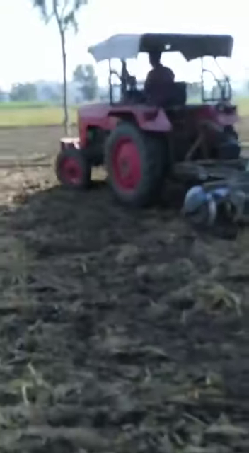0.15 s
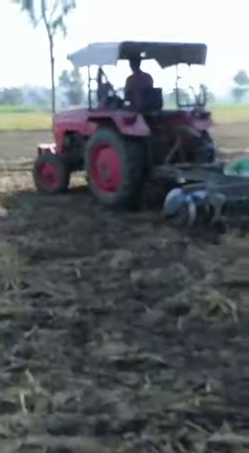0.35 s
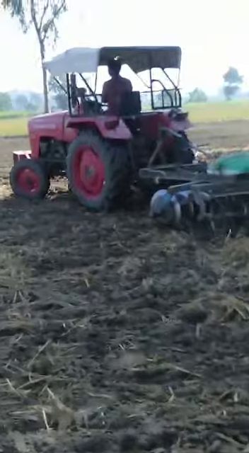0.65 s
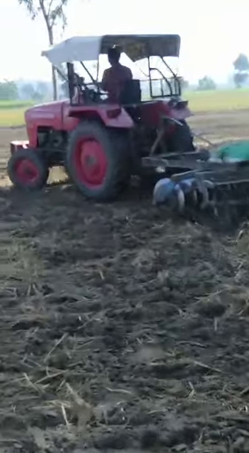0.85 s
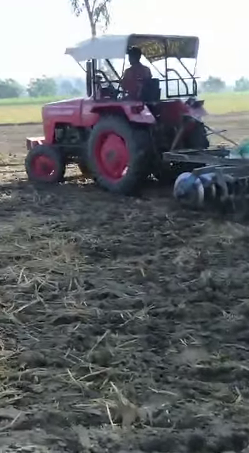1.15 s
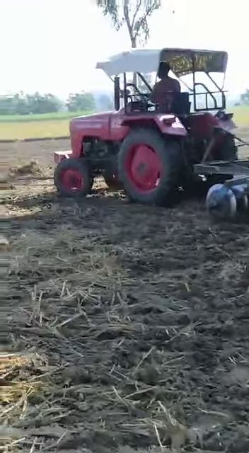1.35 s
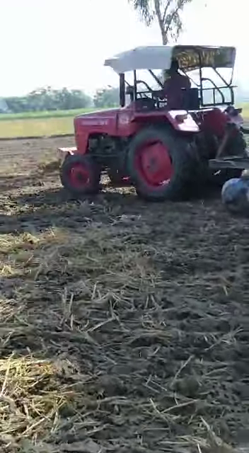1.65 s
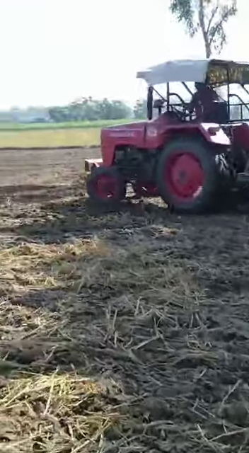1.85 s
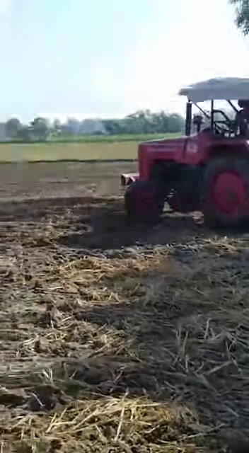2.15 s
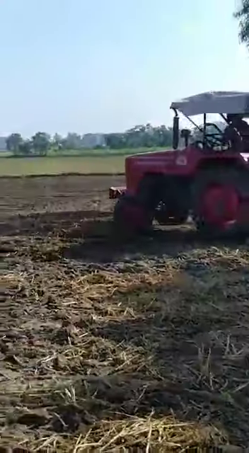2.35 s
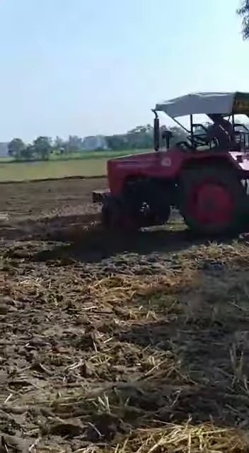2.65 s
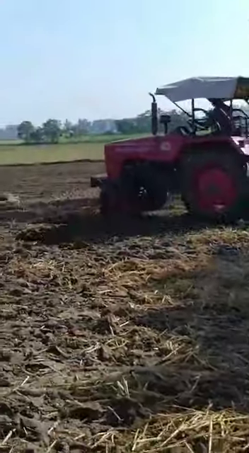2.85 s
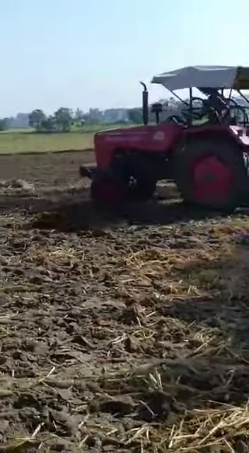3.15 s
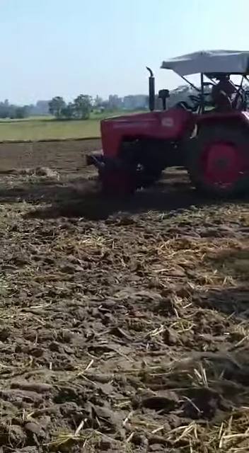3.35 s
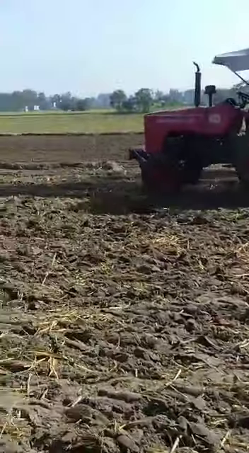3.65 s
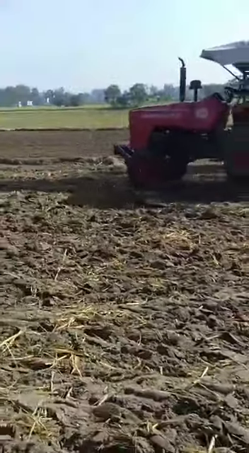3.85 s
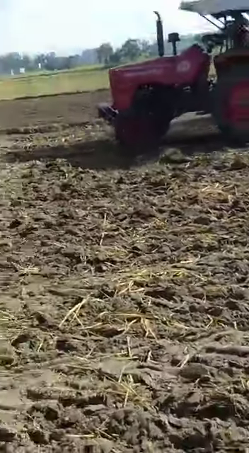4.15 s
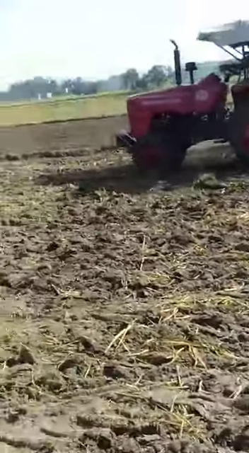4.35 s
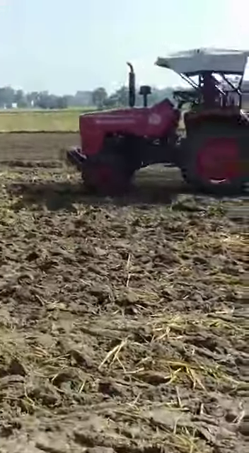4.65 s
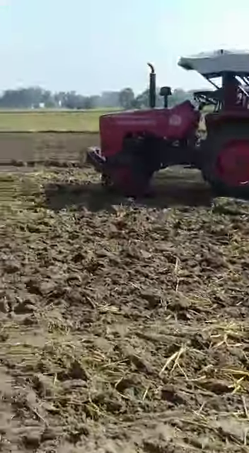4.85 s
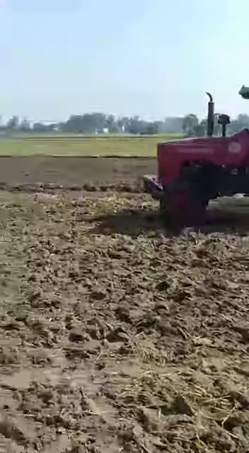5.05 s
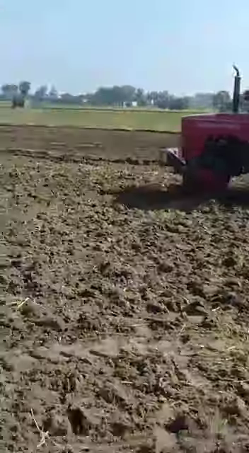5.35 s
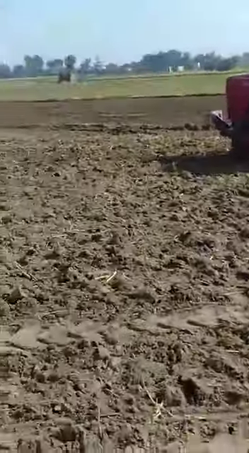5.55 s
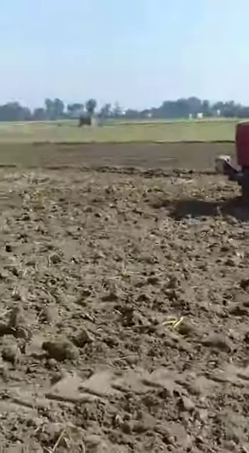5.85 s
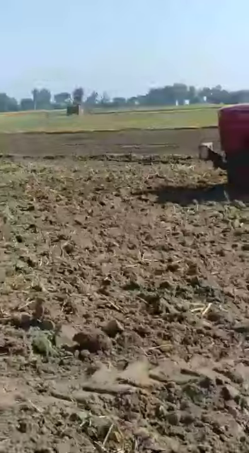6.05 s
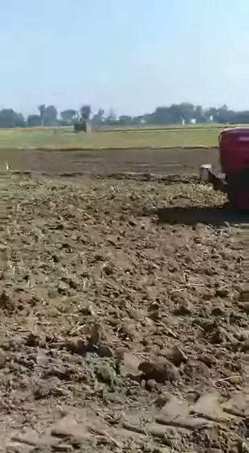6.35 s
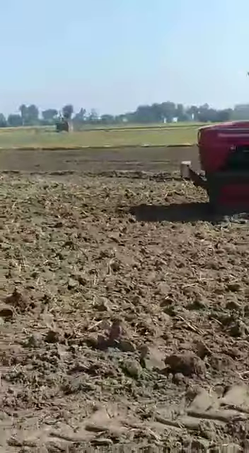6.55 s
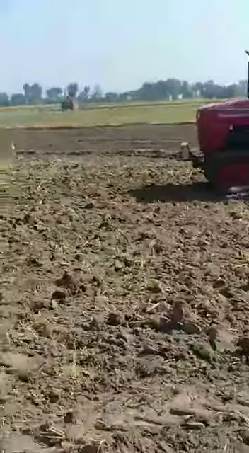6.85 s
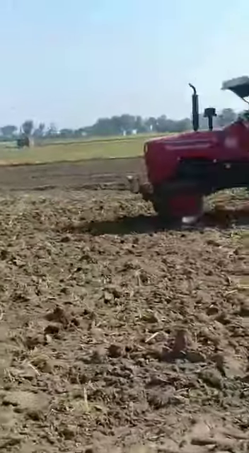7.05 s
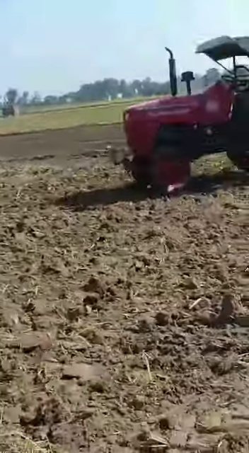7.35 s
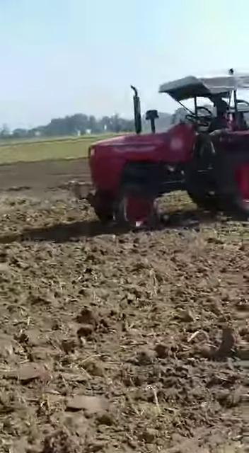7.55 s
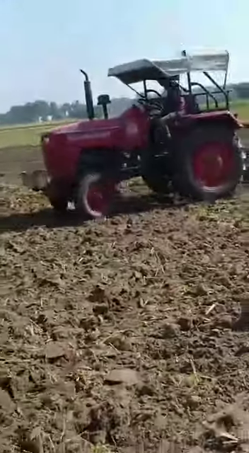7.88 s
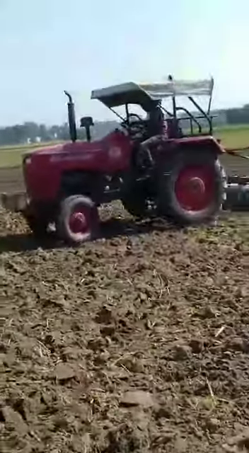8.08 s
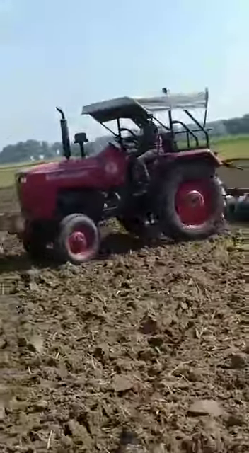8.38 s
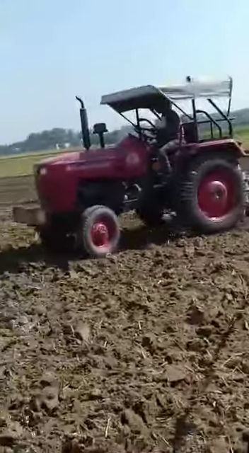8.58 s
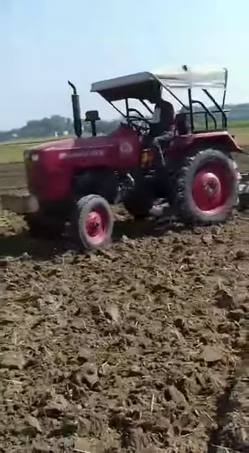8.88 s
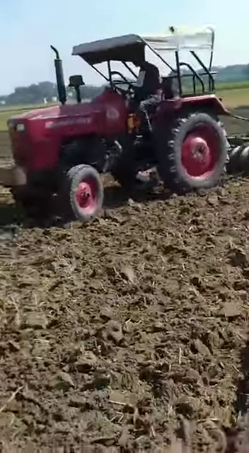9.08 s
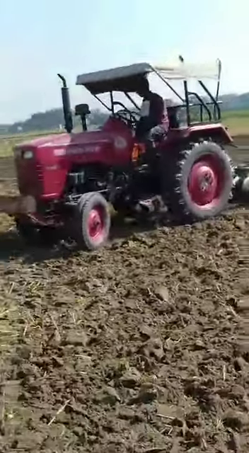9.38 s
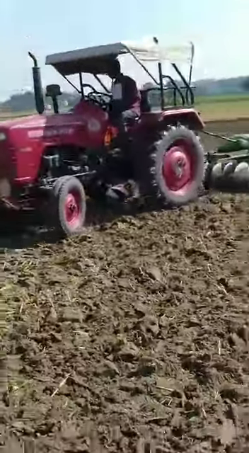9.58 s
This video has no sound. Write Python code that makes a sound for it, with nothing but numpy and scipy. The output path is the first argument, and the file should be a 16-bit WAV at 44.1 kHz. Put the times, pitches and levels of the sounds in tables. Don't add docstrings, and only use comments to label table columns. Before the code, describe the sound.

A four-cylinder diesel tractor clatters and throbs under load, dragging a clanking disc harrow over soft soil, slowly turning and growing a little louder.

```python
import sys
import numpy as np
from scipy import signal
from scipy.fft import rfft, irfft, next_fast_len
from scipy.io import wavfile
from scipy.ndimage import uniform_filter1d, map_coordinates

SR = 44100
rng = np.random.default_rng(int(sys.argv[2]) if len(sys.argv) > 2 else 0)


def field_ratio(decibels):
    return 10 ** (np.asarray(decibels, dtype=float) / 20)


def unload_wav(signal):
    wavfile.write(
        sys.argv[1],
        SR,
        np.round(np.clip(np.atleast_2d(signal).T, -1, 1) * 32767).astype(np.int16),
    )


N = 428652
TIME = np.arange(N) / SR
HZ = np.maximum(np.fft.rfftfreq(next_fast_len(N), 1 / SR), 1)
CUTOFF_HZ = 15720


def in_time(rows):
    s, *columns = np.transpose(rows)
    return [np.interp(TIME, s, column) for column in columns]


def at_hz(points, hz, axis=1):
    points = np.array(points)
    return np.interp(np.log(hz), np.log(points[:, 0]), points[:, axis])


def rms_one(x):
    return x / np.sqrt(np.mean(x ** 2) + 1e-20)


def shaped(x, gain):
    size = next_fast_len(N)
    return irfft(rfft(x, size) * gain, size)[:N]


def drift(rate_hz):
    r = np.exp(-80 * np.pi * rate_hz / SR)
    slow = signal.lfilter([1], [1, -2 * r, r * r], rng.standard_normal(N // 40 + 2002))
    slow = slow[2000:]
    return np.interp(np.arange(N) / 40, np.arange(len(slow)), rms_one(slow))


def facing(levels_db):
    # (time [s], angle between bonnet and listener [deg])
    heading = [(0, 115), (1.2, 116), (2.1, 104), (2.7, 99), (3.6, 86.2), (4.8, 89), (5.3, 69.4), (7.3, 60),
               (7.8, 47), (8.9, 43.4), (9.4, 31), (9.72, 33)]
    seen_from_deg = [140, 95, 68, 45, 30]
    return np.interp(-in_time(heading)[0], -np.array(seen_from_deg), levels_db)


def throb(cycle, rise=.16, spread=.12):
    cylinder_strength = [0.58, -0.66, -1.33, -1.1]
    firing = 4 * cycle
    number, part = firing.astype(int), firing % 1
    shape = np.minimum(part / rise, (1 - part) / (1 - rise)) - .5
    uneven = spread * rng.standard_normal(800)[number]
    cylinder_db = np.array(cylinder_strength)[number % 4]
    return uniform_filter1d(shape + uneven, size=40), uniform_filter1d(cylinder_db, size=120)


def habit(cycle, likeness=.88, size=2500):
    fresh = rng.standard_normal((220, size))
    rounds = signal.lfilter([1], [1, -likeness], fresh, axis=0)[30:].ravel()
    return rms_one(rounds[(cycle * size).astype(int)])


def iron(x, t60=.09, ring_db=-13):
    t = np.arange(4000) / SR
    turn = 1.4 * drift(.8)
    rings = rng.standard_normal((2, len(t))) * field_ratio(-60 * t / t60)
    first, second = (signal.oaconvolve(x, ring / np.linalg.norm(ring))[:N] for ring in rings)
    return x + field_ratio(ring_db) * (np.cos(turn) * first + np.sin(turn) * second)


def block(cycle, near_db, patchy_db=0.5):
    # (frequency [Hz], level [dB per Hz])
    knock_colour = [(180, -8), (250, -17), (340, -14.5), (430, -7.5), (520, 2.5), (750, -0.5), (1200, -3),
                    (1700, -4.5), (2300, 1.5), (2900, -3.5), (3500, -15), (6300, -17.5), (7600, -26.5),
                    (9500, -47.5)]
    # (frequency [Hz], share [0-1])
    repeat_share = [(250, .4), (700, .48), (1200, .48), (2200, .2), (3500, .1), (8000, .04)]
    # (frequency [Hz], swell per firing [dB])
    throb_depth = [(250, 4.5), (700, 3.5), (1200, 2), (2200, 3.5), (3500, 4.5), (8000, 4)]
    # (frequency [Hz], level seen from each of the five angles [dB])
    parts = [(300, -13, -24, -21.5, -14, -17.5), (500, -11, -11.5, -9, -6.5, -8),
             (740, -14.5, -4.5, -4.5, -4.5, -5), (1060, -18, -14, -6.5, -10, -14),
             (1560, -6.5, -6, -10, -12, -2.5), (2020, 0.5, -5.5, -4.5, -1, -4),
             (2500, -7.5, -7, -5, -5, -11), (3100, -16, -7, -8.5, -4.5, -7.5),
             (4430, -20, -16.5, -20.5, -13, -15.5), (6560, -23.5, -19, -13.5, -17, -21)]
    share, size = at_hz(repeat_share, HZ), next_fast_len(N)
    clatter = rfft(habit(cycle), size) * np.sqrt(share)
    combustion = rfft(rng.standard_normal(N), size) * np.sqrt(1 - share)
    source = (clatter + combustion) * field_ratio(at_hz(knock_colour, HZ))
    shape, cylinder_db = throb(cycle)
    together, out = drift(5.8), 0
    for octave in np.arange(7.5, 13.6, .4):
        hz = 2 ** octave
        mask = np.cos(np.pi / 2 * np.clip((np.log2(HZ) - octave) / .4, -1, 1)) ** 2
        seen_db = near_db + facing([at_hz(parts, hz, axis=k) for k in range(1, 6)])
        level_db = seen_db - seen_db.mean() + at_hz(throb_depth, hz) * shape + cylinder_db
        level_db += patchy_db * (0.13 * together + drift(2.3))
        out = out + field_ratio(level_db) * irfft(source * mask, size)[:N]
    return field_ratio(-23.5) * rms_one(iron(out))


def rattle(cycle, loud_db, per_s=600, ring_cycles=38):
    shaken = (4 * cycle % 1 < .45) & (rng.random(N) < per_s / SR)
    strength = field_ratio(4 * np.minimum(rng.exponential(1, N), 4))
    ticks = shaken * strength * rng.choice([-1, 1], N) + 1e-18
    dealt, out = rng.integers(0, 16, N), 0
    for k, hz in enumerate(np.geomspace(1000, 3100, 16)):
        r, w = field_ratio(-60 * hz / ring_cycles / SR), 2 * np.pi * hz / SR
        out = out + signal.lfilter([0, np.sin(w)], [1, -2 * r * np.cos(w), r * r], ticks * (dealt == k))
    return field_ratio(loud_db) * rms_one(out)


def over_soil(x, low_hz=800, high_hz=2100):
    # (time [s], echo level [dB], extra phase lag [turns])
    softness = [(0, -4, .02), (.8, 0, .02), (1.6, 0.5, .02), (2.4, 1, .02), (3.2, 1, 0.032), (3.7, -3, .08),
                (4.2, -4, 0.1), (5, 0.5, 0.09), (5.8, -2.5, 0.15), (6.6, -3, 0.15), (7.4, -3.5, 0.1),
                (8.5, -1, 0.13), (9.1, 1, 0.16), (9.72, -1.5, 0.057)]
    # (time [s], lag [ms])
    echo_lag = [(0, 2), (.72, 1.97), (1.44, 1.88), (1.8, 1.88), (2.16, 2.02), (2.88, 2.05), (3.6, 1.97),
                (3.96, 2.27), (4.68, 2.25), (5.76, 2.314), (6.12, 2.16), (6.48, 2.3), (6.84, 2.19),
                (7.2, 2.444), (7.92, 2.21), (8.28, 2.32), (8.64, 2.22), (9.72, 2)]
    echo_db, turns = in_time(softness)
    band = 1 / (1 + (low_hz / HZ) ** 6) / (1 + (HZ / high_hz) ** 3)
    lag_ms = in_time(echo_lag)[0] * (1 - turns / 3) + .015 * drift(3)
    late = np.arange(N) - lag_ms * SR / 1000
    even, odd = (map_coordinates(shaped(x, band * q), [late], order=1, mode="nearest") for q in (1, -1j))
    angle = 2 * np.pi * turns
    return x - field_ratio(echo_db) * (np.cos(angle) * even + np.sin(angle) * odd)


def tone(cycle, multiple, wander, swell_db, locked=False):
    start = rng.random()
    if locked:
        start = 0.01193 * multiple ** 2
    phase = 2 * np.pi * (multiple * cycle + start) + wander * drift(3.0)
    return np.sqrt(2) * field_ratio(swell_db * drift(2.77)) * np.sin(phase)


def exhaust(cycle):
    # (time [s], firing tone level [dB])
    effort = [(0, -37), (.56, -39), (1.1, -38), (1.67, -37), (2.78, -35), (3.6, -42), (3.9, -34),
              (4.2, -40), (5, -35), (6.11, -49), (6.67, -32.5), (7.35, -44), (7.78, -36), (8.33, -38),
              (8.61, -35.5), (8.89, -41), (9.16, -32), (9.72, -35.5)]
    # (multiple of the cycle, rms level seen from each of the five angles [dB])
    strong_orders = [(8, -35, -29, -37.5, -47, -52), (12, -68, -36, -39.5, -45.5, -45),
                     (7, -45.5, -42.5, -37, -39.5, -40), (16, -37, -57, -66, -55, -42.5),
                     (5, -42, -47, -44.5, -42.5, -33), (6, -35.5, -49, -47, -39, -41),
                     (9, -40, -42, -47.5, -42, -46), (10, -38.5, -40.5, -41, -44.5, -57),
                     (11, -45, -40, -49.5, -47, -49), (14, -40, -52, -59, -61, -59)]
    # (multiple of the cycle, rms level [dB])
    other_orders = [(3, -49), (13, -52), (17, -59.5), (20, -57)]
    out = field_ratio(in_time(effort)[0]) * tone(cycle, multiple=4, wander=.5, swell_db=2.2, locked=True)
    for k, *db in strong_orders:
        out += field_ratio(facing(db)) * tone(cycle, k, wander=0.91, swell_db=1.34, locked=True)
    for k, db in other_orders:
        out += field_ratio(db) * tone(cycle, k, wander=.45, swell_db=3.5)
    return out


def gears(cycle):
    # (time [s], mesh level [dB], mesh overtone level [dB])
    mesh_swell = [(0, -32.5, -62), (1.1, -32.5, -56), (1.55, -40.5, -66), (2.05, -59, -55), (2.78, -42, -49),
                  (3.2, -39, -50), (4, -32, -39), (4.72, -36, -30.5), (5.1, -42, -36), (5.6, -43, -39),
                  (5.95, -46, -45), (6.5, -33, -29), (7, -37, -51), (7.78, -39, -31.5), (8.33, -35, -60),
                  (8.89, -33.5, -30.5), (9.3, -28.5, -28.5), (9.72, -34.5, -61)]
    # (multiple of the cycle, rms level [dB])
    gear_lines = [(32, -48), (36, -50), (40, -48), (44, -51), (63, -50), (76, -50), (79, -49)]
    mesh_db, overtone_db = in_time(mesh_swell)
    out = field_ratio(mesh_db) * tone(cycle, multiple=30, wander=.7, swell_db=1.2)
    out += field_ratio(overtone_db - 3) * tone(cycle, multiple=60, wander=1.4, swell_db=2)
    for k, db in gear_lines:
        out += field_ratio(db) * tone(cycle, k, wander=.6, swell_db=4.5)
    return out


def hiss(cycle, near_db):
    # (frequency [Hz], level [dB per Hz])
    air_colour = [(7400, -2), (9500, -5), (11500, -4.5), (13000, 10), (14500, 7.5), (15800, 13)]
    # (time [s], top hiss level [dB])
    fan_beam = [(0.0, -52), (1.33, -47.5), (1.51, -54), (1.92, -51), (2.17, -53), (3.74, -49), (3.87, -48),
                (4.03, -53), (6.22, -49.5), (6.42, -53), (6.66, -49.5), (7.93, -54), (8.04, -47.5),
                (8.88, -51), (9.34, -44), (9.48, -48), (9.72, -43)]
    lower_hiss = [-35, -32, -35.5, -27.5, -32.5]
    middle_hiss = [-8.5, -11, -6.5, -9.5, -6.5]
    shape, cylinder_db = throb(cycle, rise=.3, spread=0.35)
    air = rng.standard_normal(N)
    colour = field_ratio(at_hz(air_colour, HZ)) * (HZ > 7500) * (HZ < CUTOFF_HZ)
    above_lower, above_middle = (np.clip((HZ - hz) / 1000, 0, 1) for hz in (11400, 13000))
    shares = 1 - above_lower, above_lower - above_middle, above_middle
    fan_db, = in_time(fan_beam)
    calmer_db = fan_db.mean() + .6 * (fan_db - fan_db.mean())
    levels = near_db + facing(lower_hiss), calmer_db + facing(middle_hiss), fan_db
    out = 0
    for db, share in zip(levels, shares):
        pulse_db = 1.7 * shape + .6 * cylinder_db + 0.43 * drift(18)
        out = out + field_ratio(db + pulse_db) * rms_one(shaped(air, colour * share))
    return out


def clanks():
    # (time [s], peak level [dB], pitch [Hz])
    clank_events = [(0.5142, -13, 2380), (1.698, -15, 1870), (1.9455, -2, 2500), (1.957, -12, 2530),
                    (2.588, -7, 2160), (2.7018, -4, 2220), (2.8739, -6, 2130), (3.7683, -8, 2250),
                    (4.9536, -15, 2300), (9.2454, -7, 2140), (9.5741, 0, 1750), (9.6405, -2, 1790)]
    # (ratio to pitch, level [dB], t60 [s])
    steel_modes = [(1, 0, .06), (.92, -3, .06), (1.2, -7, .03), (2.05, -21, .04), (3.1, -22, .05)]
    out, t = np.zeros(N + 8000), np.arange(8000) / SR
    for s, db, hz in clank_events:
        ring = 0
        for ratio, mode_db, t60 in steel_modes:
            ring = ring + field_ratio(db - 11.0 + mode_db - 60 * t / t60) * np.sin(2 * np.pi * hz * ratio * t)
        start = round(s * SR)
        out[start:start + len(t)] += ring * np.minimum(t / 0.0016, 1)
    return out[:N]


def thud(start_s=6, peak_db=-12, hz=98, t60=0.16):
    t = np.maximum(TIME - start_s, 0)
    return field_ratio(peak_db - 60 * t / t60) * np.minimum(t / 0.016, 1) * np.sin(2 * np.pi * hz * t)


def rumble():
    # (time [s], rise [dB], length [s])
    gusts = [(0, 17, .08), (.73, -1, 0.112), (1.3, 7, .25), (1.9, 0, .3), (3.3, 7, .3), (4.2, 8, 0.17),
             (4.57, 10, 0.12), (5, 1, .25), (5.954, 18, 0.36), (6.75, 10, .25), (7.117, 7, .1),
             (7.85, 10, 0.23), (8.25, 8, .15), (8.68, 15, 0.168), (9.1, 3, .2), (9.66, 7, .3)]
    soil_levels = [-48, -40, -40, -41, -39]
    # (frequency [Hz], level [dB per Hz])
    soil_colour = [(40, -15), (65, -3), (110, 8), (170, 5), (230, -5.5), (300, -6)]
    gust_db = sum(db * np.exp(-((TIME - s) / length) ** 2) for s, db, length in gusts)
    wind_db = -52 + gust_db
    soil_db = facing(soil_levels) + .3 * gust_db
    wind = shaped(rng.standard_normal(N), 1 / (1 + (14 / HZ) ** 2) / (1 + (HZ / 50) ** 3))
    soil = shaped(rng.standard_normal(N), field_ratio(at_hz(soil_colour, HZ)) * (HZ > 30) * (HZ < 330))
    wind = field_ratio(wind_db + 1.5 * drift(6)) * rms_one(wind)
    return wind + field_ratio(soil_db + 3.5 + 3.2 * drift(3.9)) * rms_one(soil)


def scene():
    # (time [s], speed [engine cycles per s])
    crank_speed = [(0, 16.87), (.28, 16.85), (.6, 16.73), (1.11, 16.88), (1.67, 17.13), (2.22, 17.45),
                   (2.78, 17.5), (3.5, 17.68), (3.89, 17.62), (4.72, 17.7), (6.11, 17.65), (6.5, 17.49),
                   (7.15, 17.71), (7.6, 17.59), (8.05, 17.62), (8.7, 17.74), (9.16, 17.62), (9.72, 17.71)]
    # (time [s], nearness as engine level [dB])
    course = [(0.0, -22), (1.81, -20.5), (1.87, -22.5), (1.95, -21), (2.11, -23.5), (2.76, -21),
              (3.36, -22.5), (5.2, -23), (5.6, -25), (6.58, -23.5), (6.98, -24.5), (9.01, -21.5),
              (9.28, -18), (9.5, -18.5), (9.69, -19), (9.72, -16)]
    cycle = np.cumsum(in_time(crank_speed)[0]) / SR
    near_db = uniform_filter1d(in_time(course)[0], size=6000, mode="nearest")
    body = block(cycle, near_db) + rattle(cycle, near_db - 16.5)
    engine = over_soil(body) + exhaust(cycle) + gears(cycle) + hiss(cycle, near_db)
    return (engine + clanks() + thud() + rumble())[None]


def low_pass(x):
    return signal.sosfilt(signal.butter(12, 17010, fs=SR, output="sos"), x)


def record(dry):
    mix = shaped(dry[0], HZ < CUTOFF_HZ)[None]
    return low_pass(mix)


dry = scene()
out = record(dry)
unload_wav(out)
```